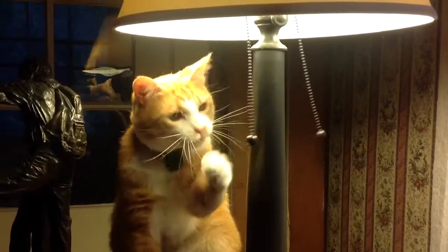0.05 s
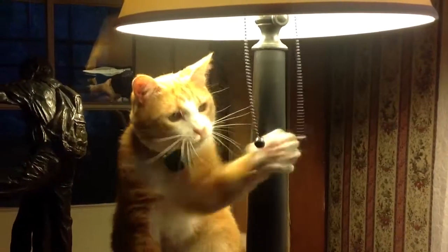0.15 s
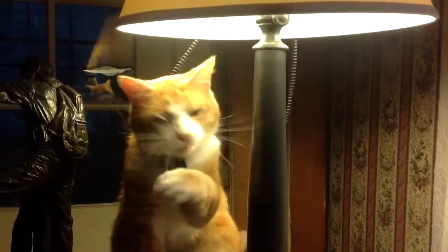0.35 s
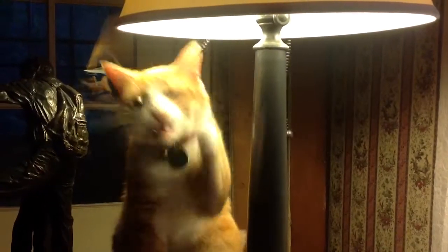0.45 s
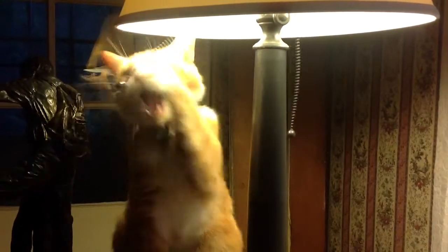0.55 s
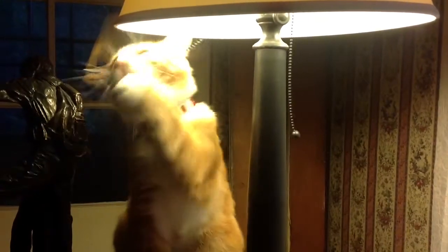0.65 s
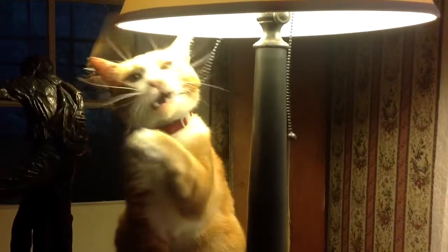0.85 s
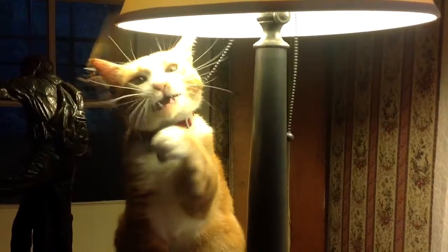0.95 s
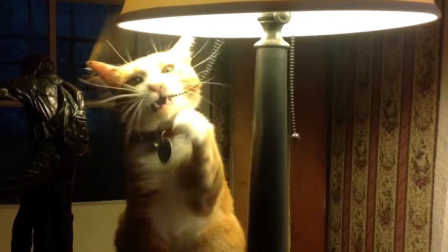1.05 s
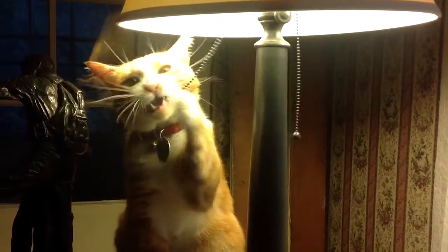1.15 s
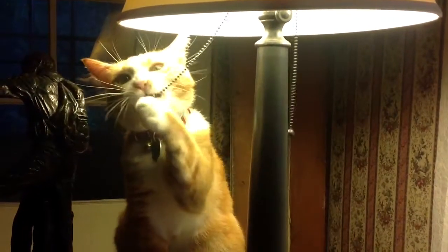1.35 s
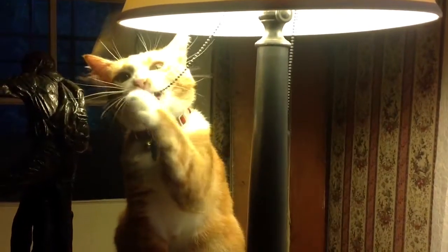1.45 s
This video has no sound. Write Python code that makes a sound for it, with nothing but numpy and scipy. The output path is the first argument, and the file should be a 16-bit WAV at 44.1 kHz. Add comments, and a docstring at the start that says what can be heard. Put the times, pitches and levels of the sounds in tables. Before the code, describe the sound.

Two bright, ringing clinks of a metal chain ball on a table lamp, the first loud and the second weaker, with tiny bead ticks between. The ring fades in a quiet room under a cat's barely audible pawing.

```python
"""A quiet room: a cat plays with the bead chain of a table lamp.
The lamp still hums from an earlier knock. The chain's metal ball strikes it twice;
each hit clacks and rings paired modes that beat like a bell's, plus one room resonance.
Beads tick faintly between the hits. At the end, a soft low rustle as the cat paws the chain."""
import sys
import numpy as np
from scipy import signal
from scipy.fft import rfft, irfft
from scipy.io import wavfile

SR = 44100
rng = np.random.default_rng(int(sys.argv[2]) if len(sys.argv) > 2 else 0)


def output_pcm(signal):
    """Save a mono or channel-first signal as 16-bit PCM at the path in sys.argv[1].

    Samples are clipped to [-1, 1] before scaling.
    """
    pcm = np.clip(np.atleast_2d(signal).T, -1, 1) * 32767
    wavfile.write(sys.argv[1], SR, np.round(pcm).astype(np.int16))


N = 66150

# room air (frequency [Hz], relative density [dB])
AIR_SPECTRUM = [(25, -9.5), (60, -6.5), (100, -4.5), (160, -0.5), (230, -0.5), (350, -10.5), (700, -11.5),
                (1500, -16), (4000, -17.5), (9000, -18), (15000, -21.5)]
# modes left ringing by the earlier knock (frequency [Hz], t60 [s], level [dB])
HUM_MODES = [(1405.8, 2.2, -48.5), (2224, .8, -63), (3251, 2.1, -65), (3836.1, .81, -61),
             (3858.4, 1.0, -64)]
# ball on lamp (time [s], clack level [dB], clack low-pass [Hz], ring gain [dB], ring tilt [dB/octave])
BALL_HITS = [(0.2284, -12.5, 16000, 0.16, -0.48), (0.9305, -27, 8200, -0.46, -0.5)]
# lamp modes, plus one room resonance near 970 Hz that rings on after each hit; hit spots differ
# (frequency [Hz], t60 [s], hit 1 level [dB], hit 2 level [dB])
RING_MODES = [ (455, 0.14, -44, -52), (951, 0.094, -30, -34.5), (968, .5, -46.5, -50),
              (1124, 0.06, -31, -39), (1276, 0.042, -34.5, -38), (1395, 0.032, -43.5, -54),
              (1405.8, 2.15, -44, -56), (1419.7, 1.05, -45, -51), (2218.6, .7, -39, -45),
              (2226.5, .68, -32.5, -38.5), (3250.8, 2.08, -45, -55), (3266.8, 1.8, -68, -60),
              (3745.6, .33, -40, -46), (3836.1, .82, -26, -36.5), (3858.6, 1.0, -50, -38),
              (4565, .46, -32, -47), (4598.5, .48, -45, -34), (5372, .3, -34, -47), (5412, .14, -31, -38),
              (5589, .3, -33, -43), (5650, .12, -32, -43), (6424, .34, -37, -48), (6482, .14, -30, -40),
              (6515, .22, -24, -27), (7068, .45, -44, -48), (7145.6, .28, -30, -47), (7630, .2, -30, -43),
              (7750, .25, -41, -46), (7815, .16, -32, -41), (7920, .195, -11, -32), (8614, .16, -27, -31),
              (8681, .18, -24, -42), (8790, .12, -30, -45), (9142, .2, -39, -51), (9477, .15, -32, -41),
              (9613, .13, -23, -46), (10265, .18, -39, -46), (10388, .13, -29, -52), (10780, .13, -31, -46),
              (11182, .16, -34, -42), (11324, .11, -24, -53), (12130, .12, -37.5, -51),
              (12360, 0.12, -32.5, -52), (12900, 0.091, -28.5, -56), (12980, 0.069, -27, -52),
              (13200, 0.044, -27, -50), (13600, .1, -33, -49), (13810, .1, -35, -56),
              (14580, 0.12, -39, -54)]
# contact clack (frequency [Hz], relative density [dB])
CLACK_SPECTRUM = [(100, -42.5), (330, -31.5), (480, -23), (780, -31.5), (950, -10), (1300, -15),
                  (1700, -23.5), (2300, -12.5), (3100, -16.5), (4000, -5), (6000, -7), (8500, 3),
                  (13000, 1.5), (14500, -3), (15500, -18.5)]
# room tail of the clack (frequency [Hz], relative density [dB])
TAIL_SPECTRUM = [(150, -27.5), (420, -11), (750, -5), (1000, 4.5), (1300, -5), (1700, -17.5), (2700, -8),
                 (4500, -8.5), (8500, 2.5), (13000, -5.5), (15500, -19)]
# room reflections of the ring (frequency [Hz], gain [dB])
ROOM_GAINS = [(500, -13.5), (1400, -19), (2200, -26), (3800, -24), (5500, -10.5), (8000, -18), (13000, -12)]
# bead ticks (time [s], level [dB], centre [Hz], width [octaves])
BEAD_TICKS = [(0.638, -57, 8300, 0.14), (0.6573, -44.5, 2300, 0.75), (0.66, -50, 9700, 0.48),
              (0.675, -61, 9950, .025), (0.787, -56, 10000, 1.1), (0.8648, -54, 11500, .6)]
# paw on chain (frequency [Hz], relative density [dB])
RUSTLE_SPECTRUM = [(80, -32), (170, -14), (260, 0.5), (400, -9.5), (600, -17), (1200, -19.5), (3000, -29)]


def from_db(db):
    """Decibels to gain."""
    return 10 ** (np.asarray(db) / 20)


def since(start_s):
    """Seconds since start_s; zero before."""
    return np.maximum(np.arange(N) / SR - start_s, 0)


def decay(start_s, t60_s):
    """Step onset, exponential decay."""
    t = since(start_s)
    return (t > 0) * from_db(-60 * t / t60_s)


def bins_hz():
    """FFT bin frequencies, floored at 1 Hz."""
    return np.maximum(np.fft.rfftfreq(N, 1 / SR), 1)


def colour(points):
    """Gain per bin from (frequency [Hz], level [dB]) points."""
    hz, db = np.transpose(points)
    return from_db(np.interp(np.log(bins_hz()), np.log(hz), db))


def noise(gain):
    """Noise shaped per bin, rms 1."""
    x = irfft(rfft(rng.standard_normal(N)) * gain, N)
    return x / np.sqrt(np.mean(x ** 2))


def mode(start_s, hz, t60_s, db):
    """Damped sine."""
    return from_db(db) * decay(start_s, t60_s) * np.sin(2 * np.pi * hz * since(start_s))


def low_cut(x, hz, order):
    """Butterworth high-pass."""
    return signal.sosfilt(signal.butter(order, hz, "high", fs=SR, output="sos"), x)


def air(level_db=-67.5):
    """Still room air with a thin hiss."""
    return from_db(level_db) * noise(colour(AIR_SPECTRUM))


def lamp_hum():
    """Long-lived modes ring on from an earlier knock."""
    return sum(mode(0, hz, t60_s, db) for hz, t60_s, db in HUM_MODES)


def hit_ring(rise_s=0.0015, pivot_hz=4000):
    """Each hit excites the lamp's modes and one room resonance; the ring builds during contact."""
    out = np.zeros(N)
    for hit, (start_s, _, _, ring_db, tilt_db_per_oct) in enumerate(BALL_HITS):
        rise = 1 - np.exp(-since(start_s) / rise_s)
        for k, (hz, t60_s, *levels_db) in enumerate(RING_MODES):
            db = levels_db[hit] + ring_db + tilt_db_per_oct * np.log2(hz / pivot_hz)
            polarity = (-1) ** ((k + 1) // 2)   # some modes swing out, some in
            out += polarity * rise * mode(start_s, hz, t60_s, db)
    return out


def ball_clacks(t60_s=0.042, tail_db=-21, tail_t60_1khz_s=0.45):
    """Bright crack per contact, plus a diffuse room tail whose treble dies first."""
    out, hz = np.zeros(N), bins_hz()
    edges_hz = [0, 700, 1500, 3000, 6000, 10000, SR]
    centres_hz = [500, 1000, 2100, 4200, 7700, 12500]
    for start_s, db, top_hz, _, _ in BALL_HITS:
        low_pass = 1 / np.sqrt(1 + (hz / top_hz) ** 4)
        out += from_db(db) * noise(low_pass * colour(CLACK_SPECTRUM)) * decay(start_s, t60_s)
        tail_bins = rfft(noise(low_pass * colour(TAIL_SPECTRUM)))
        for low_hz, high_hz, centre_hz in zip(edges_hz, edges_hz[1:], centres_hz):
            band = irfft(tail_bins * (hz >= low_hz) * (hz < high_hz), N)
            band_t60_s = tail_t60_1khz_s * (1000 / centre_hz) ** 0.22
            out += from_db(db + tail_db) * band * decay(start_s, band_t60_s)
    return out


def reflections(x, delay_s=0.0032, t60_s=0.31):
    """Dense reflections of a small furnished room."""
    response = rng.standard_normal(N) * decay(delay_s, t60_s)
    response /= np.sqrt(np.sum(response ** 2))
    wet = signal.fftconvolve(x, response)[:N]
    return irfft(rfft(wet) * colour(ROOM_GAINS), N)


def bead_ticks(t60_s=0.004, tail_db=-16, tail_t60_s=0.16):
    """Chain beads tick: dry noise bursts with short tails."""
    out = np.zeros(N)
    for start_s, db, centre_hz, width_oct in BEAD_TICKS:
        band_gain = np.exp(-0.5 * (np.log2(bins_hz() / centre_hz) / width_oct) ** 2)
        envelope = decay(start_s, t60_s) + from_db(tail_db) * decay(start_s, tail_t60_s)
        out += from_db(db) * noise(band_gain) * envelope
    return out


def paw_rustle(peak_s=1.19, width_s=0.17, level_db=-64):
    """Paw rubs the chain: low noise swells and fades."""
    swell = np.exp(-0.5 * ((since(0) - peak_s) / width_s) ** 2)
    return from_db(level_db) * swell * noise(colour(RUSTLE_SPECTRUM))


def scene():
    """Lamp, chain and room at one point; two identical channels."""
    ring = hit_ring()
    hits = ring + reflections(ring) + ball_clacks()
    hits = low_cut(hits, hz=940, order=2)   # the small lamp radiates no bass
    mono = hits + lamp_hum() + bead_ticks() + paw_rustle() + air()
    return np.array([mono, mono])


def record(dry, top_hz=15400):
    """Small microphone: bass loss, steep treble cut."""
    thin = low_cut(dry, hz=125, order=4)
    return signal.sosfilt(signal.ellip(10, 0.2, 80, top_hz, fs=SR, output="sos"), thin)


dry = scene()
out = record(dry)
output_pcm(out)
```